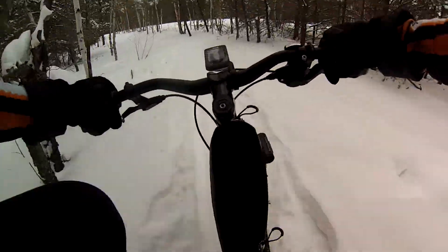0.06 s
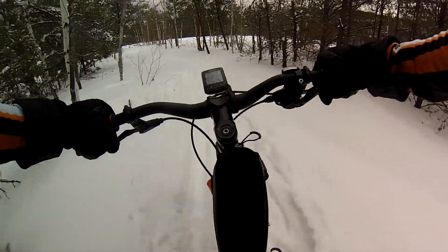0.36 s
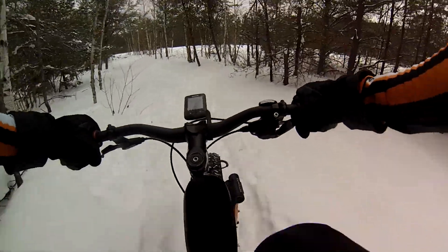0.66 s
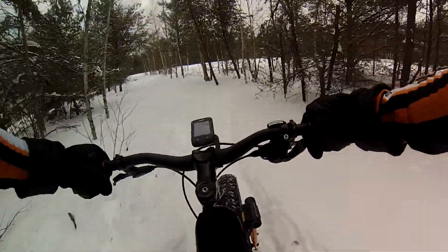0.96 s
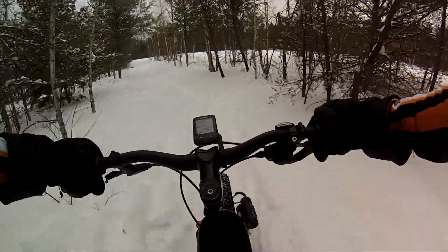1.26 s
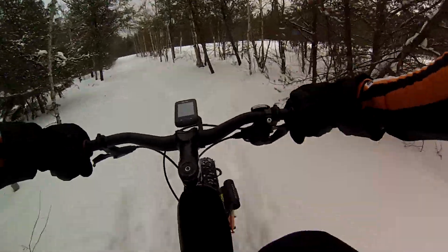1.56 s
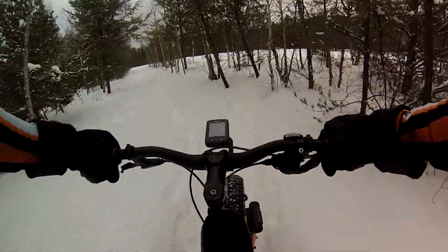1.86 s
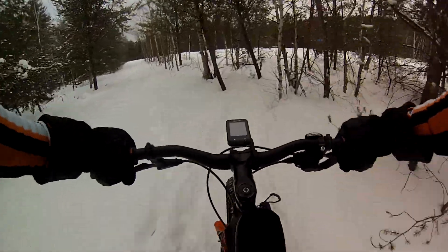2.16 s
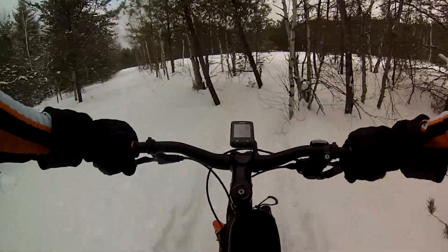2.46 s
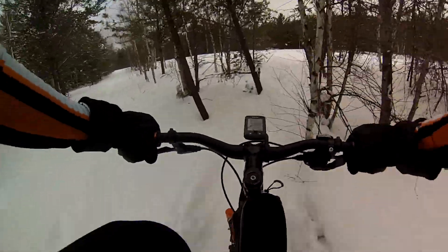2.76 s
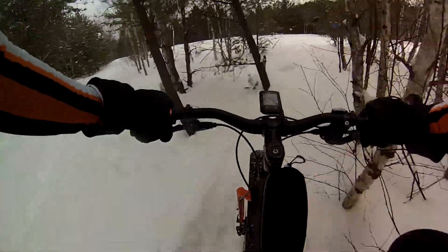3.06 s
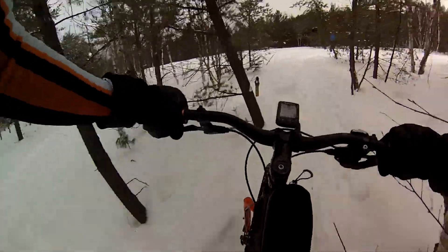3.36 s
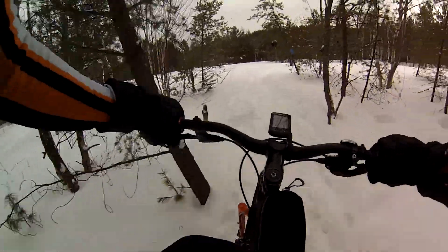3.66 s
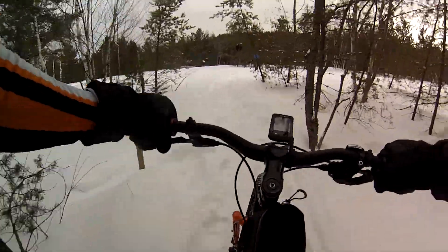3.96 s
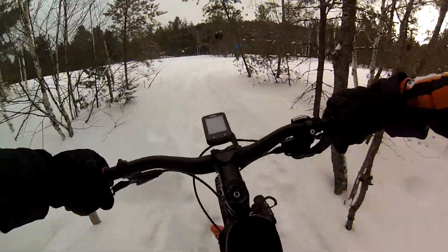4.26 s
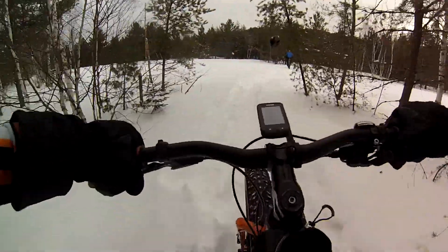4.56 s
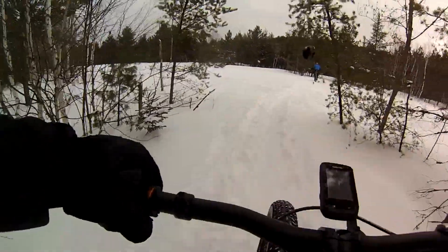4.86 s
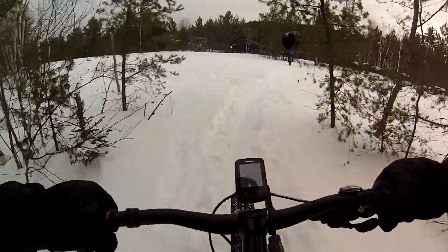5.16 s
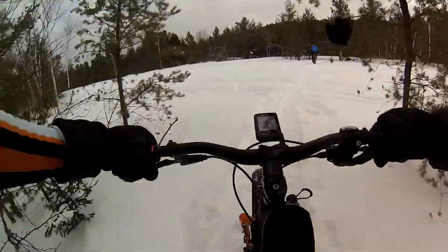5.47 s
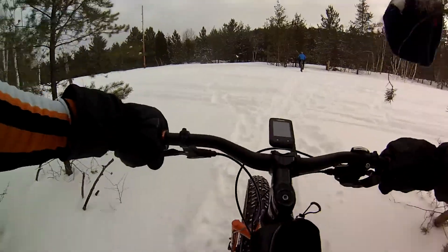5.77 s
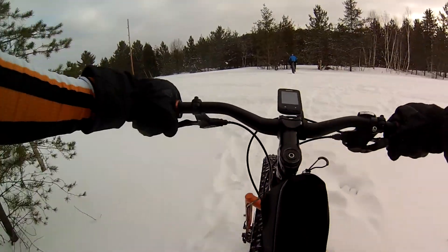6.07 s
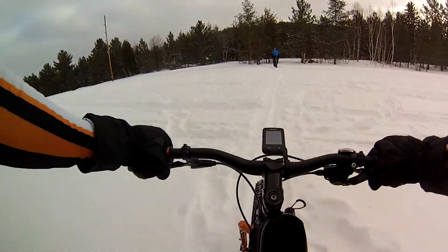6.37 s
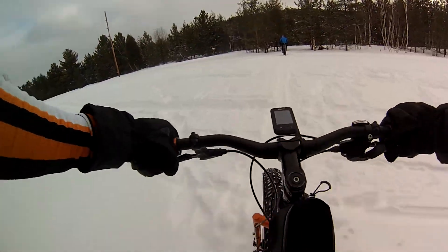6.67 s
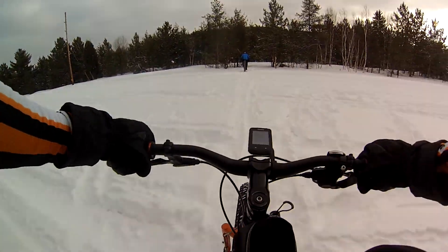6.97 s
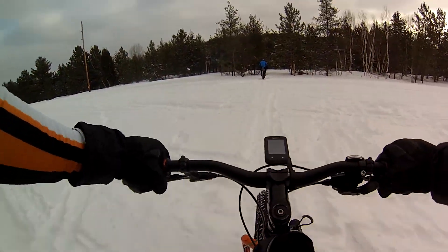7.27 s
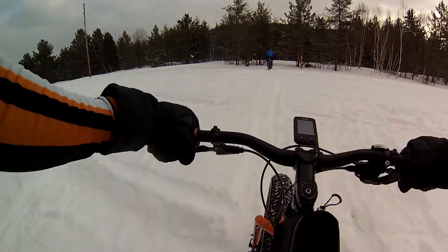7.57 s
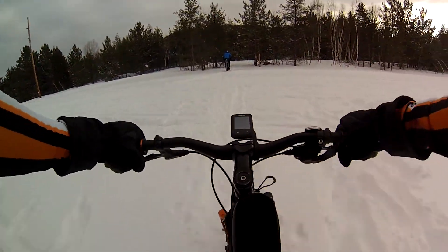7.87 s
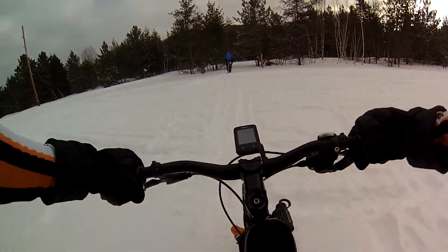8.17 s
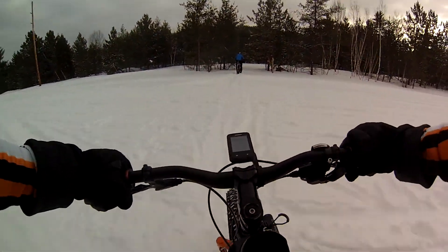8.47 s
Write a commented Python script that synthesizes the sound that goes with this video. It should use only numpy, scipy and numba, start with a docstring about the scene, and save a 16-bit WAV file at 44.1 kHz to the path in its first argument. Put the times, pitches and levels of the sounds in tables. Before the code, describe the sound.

A fast heartbeat thumps from start to finish, about 145 beats a minute, heard close and muffled through a closed camera case on a cyclist's chest. Each deep thud has a brief, slight buzz. Under it runs a low rumble of body sway, swelling over ruts around 2.2, 2.6, 3.6, 4.5 and 7.9 seconds. Tyres hush and crunch very faintly in the snow.

The bike gives light, dry knocks, often with soft harness bumps, at about 1.5, 2.2, 2.9, 3.4, 3.6, 6.1 and 6.6 seconds. Between 3.2 and 3.9 seconds twigs or a sleeve rustle quietly, with a few thin snaps of ice or twig. Small, sharp plastic ticks come near 0.2, 4.6, 5.5, 7 and 7.7 seconds, the clearest at 5.5. From 7.6 to 8.4 seconds the knocks and clicks bunch together while the heartbeat keeps its pace.

```python
"""Fat-tyre bike on a snowy trail

The ride is heard from a closed camera case strapped to the rider's chest. A fast heartbeat thumps
through the strap, and the camera's stepped limiter buzzes briefly on each big swing. The body's sway
rumbles, tyres hush and crunch in the snow, twigs or a sleeve rustle, and the bike knocks and ticks."""
import sys
import numpy as np
from scipy import signal
from scipy.fft import rfft, irfft, next_fast_len
from scipy.io import wavfile
from scipy.ndimage import uniform_filter1d, map_coordinates
from numba import njit

SR = 44100
rng = np.random.default_rng(int(sys.argv[2]) if len(sys.argv) > 2 else 0)


def wav_out(sig):
    """Save sig, one row per channel (or a flat mono array), as 16-bit PCM at SR to the path in sys.argv[1]."""
    wavfile.write(sys.argv[1], SR, np.round(np.clip(np.atleast_2d(sig).T, -1, 1) * 32767).astype(np.int16))


N = 384111
TIME = np.arange(N) / SR
LURCH_S = 0.091  # standard deviation in time of a lurch or glide

# Heartbeats. Each row: time in seconds, outward push, inward draw and recoil in dB,
# delay of the recoil in seconds, split of the recoil from 0 to 1.
BEATS = [(0.2207, -6, -9.5, -7.5, 0.022, 0.14), (0.6292, -7, -7.5, -12.5, 0.024, .65),
         (1.0431, -4.5, -9.5, -12, 0.022, 0.14), (1.4526, -6.5, -14, -6.5, 0.022, 0.72),
         (1.864, -9.5, -9.5, -13.5, 0.027, 0.77), (2.277, -5, -12.5, -6.5, 0.018, 0),
         (2.6836, -4.5, -14.5, -9.5, .026, 0.83), (3.0944, -7.5, -6.5, -26, 0.03, .25),
         (3.5092, -3.5, -7, -11, .023, 0), (3.920, -9.5, -9, -12.5, 0.027, .7),
         (4.3272, -4.5, -10.5, -17, 0.024, 0.24), (4.7414, -5.5, -9, -10, 0.021, 0),
         (5.15, -7, -13, -12, 0.024, 0.83), (5.5642, -5, -8, -11, 0.026, 0.13),
         (5.9771, -5, -12, -8.5, 0.017, 0.3), (6.3812, -6.5, -12.5, -13, 0.024, 0.97),
         (6.7952, -5.5, -8.5, -11, 0.028, 0.97), (7.2074, -3.5, -9.5, -6.5, .021, 0.04),
         (7.6148, -6.5, -18, -14, 0.022, 0.84), (8.0251, -2, -11.5, -10.5, 0.023, 0.5),
         (8.4374, -6, -6.5, -5, .019, 0.03)]


def heart(draw_width=.0057, push_width=.0049, recoil_width=.004, second_hz=54.3, second_db=-35.5):
    """Conduction through the body: each beat draws the chest wall in and pushes it out; it recoils."""
    out = np.zeros(N)
    t = np.arange(SR // 2) / SR - .1
    lobe = lambda at, width: np.exp(-.5 * ((t - at) / width) ** 2)
    for s, push_db, draw_db, recoil_db, lag, split in BEATS:
        push = amp(push_db) * lobe(0, push_width)
        lead = .0041 + .012 * amp(draw_db)  # a deeper draw starts earlier
        draw = amp(draw_db) * lobe(-lead, draw_width)
        early_recoil = (.47 * split - .17) * lobe(lag - .0115, .0033)
        recoil = amp(recoil_db) * lobe(lag, recoil_width) + early_recoil
        settle = amp(-18) * (lobe(lag + .018, 0.009) - 0.29 * lobe(lag + 0.1134, 0.025))
        second_s = 0.21 + rng.normal(0, 0.0068)  # the soft second heart sound
        envelope = amp(second_db + rng.normal(0, 0.54)) * lobe(second_s, 0.013)
        second = envelope * np.sin(2 * np.pi * second_hz * (t - second_s))
        add(out, s + t[0], push - draw - recoil + settle + second)
    return out


def sway(level_db=-26.5, dip_db=13, cap_db=-12.5):
    """Soft saturation: the torso rocks the case in a deep rumble, capped so its swells do not buzz."""
    # Spectrum of the rocking. Each row: frequency in Hz, relative level in dB.
    spectrum = [(5, -19), (11, -2.5), (17, 3.5), (25, -3), (35, -12.5), (50, -22), (70, -29), (100, -37.5),
                (150, -44.5), (250, -69.5), (500, -77), (1000, -110)]
    # Glides over smooth snow. Each row: time in seconds, change of the rumble in dB.
    glides = [(0.92, -0.5), (1.25, -2), (1.98, -5), (4.23, -9.5), (5.35, -3), (5.66, -1.5), (5.88, -2.5),
              (6.92, 2), (7.78, -4), (8.62, 3.5)]
    rumble = coloured(rng.standard_normal(N), spectrum)
    local_rms = np.sqrt(np.abs(uniform_filter1d(rumble ** 2, size=6000)) + 1e-6)
    beating = beat_swells(0, .022)  # the rumble dips briefly under each heartbeat thump
    gliding = sum(db * swell(s, LURCH_S) for s, db in glides)
    rocking_db = level_db + lurching() + gliding + 2.2 * wobble(5) - dip_db * beating
    rocking = amp(rocking_db) * unit(rumble / local_rms)
    swing = np.abs(signal.hilbert(rocking, next_fast_len(N)))[:N] / amp(cap_db)
    return rocking / (1 + swing ** 6) ** (1 / 6)


def lurching():
    """Base excitation: the dB that ruts add to the rocking of bike and rider."""
    # Lurches through ruts. Each row: time in seconds, rise of the rumble in dB.
    lurches = [(2.151, 9.5), (2.572, 9.5), (2.972, 3), (3.601, 8.5), (4.5, 12), (6.121, 5), (6.684, 4.5),
               (7.929, 12.5), (8.23, 1), (8.39, 3.5)]
    return sum(db * swell(s, LURCH_S) for s, db in lurches)


def flutter(level_db=-28.5):
    """Transient vibration: chest wall and strap shiver in the wake of every beat."""
    # Spectrum of the shiver. Each row: frequency in Hz, relative level in dB.
    spectrum = [(25, -22), (50, -5), (74, 6), (100, -13), (160, -28), (240, -37), (500, -46.5), (1000, -82)]
    wake = beat_swells(delay=0.013, width=0.017)
    return amp(level_db) * wake * coloured(rng.standard_normal(N), spectrum)


def frame_knocks(focus_db=6.5, focus_octaves=0.2):
    """Modal ringing: ruts knock the frame, and where a blow lands decides which modes ring most."""
    # Knocks of the frame and its bag. Each row: start in seconds, peak in dB, favoured pitch in Hz.
    knocks = [(0.615, -41, 1530), (1.452, -35, 1500), (1.519, -41, 1370), (2.1522, -27.5, 1600),
              (2.899, -27, 1630), (3.3948, -33, 1490), (3.598, -28, 1290), (4.364, -42, 1250),
              (4.512, -41, 900), (5.701, -41, 950), (5.808, -44, 1250), (6.137, -31.5, 1600),
              (6.604, -46, 1400), (6.645, -38.5, 1600), (7.614, -34, 1240), (7.932, -31.5, 1250),
              (7.935, -47, 2200), (8.261, -39, 1250), (8.31, -31, 980), (8.42, -28.5, 1600)]
    # Modes of the frame. Each row: frequency in Hz, relative level in dB, 60 dB decay time in seconds.
    frame = [(370, -4.5, 0.032), (540, -2.5, 0.011), (895, 6, 0.015), (1254, -2, 0.021),
             (1606, -2.5, 0.019), (1990, -11, 0.017), (2410, -9, 0.012)]
    out = np.zeros(N)
    for s, db, centre_hz in knocks:
        modes = [(hz, level + focus_db * np.exp(-(np.log2(hz / centre_hz) / focus_octaves) ** 2), t60)
                 for hz, level, t60 in frame]
        add(out, s, amp(db) * blow(modes, attack=0.0006, scrape=0.091, scrape_t60=0.026))
    return out


def mount_ticks(gain_db=1.0, band_hz=(1860, 3400)):
    """Band-limited radiation: the small plastic mount rings in a narrow band over a broad contact tap."""
    # Ticks of the mount. Each row: start in seconds, level in dB.
    ticks = [(2.155, -40), (2.846, -40), (3.388, -41), (4.565, -31), (4.8224, -39), (5.55, -21.5),
             (6.0354, -41.5), (7.0447, -27.5), (7.92, -42), (8.218, -48)]
    # Modes of the mount. Each row: frequency in Hz, relative level in dB, 60 dB decay time in seconds.
    modes = [(1980, 0, 0.022), (2270, 6, 0.013), (2560, 7.5, 0.0066), (2840, 0.5, 0.0096)]
    # Spectrum of the tap. Each row: frequency in Hz, relative level in dB.
    tap = [(600, -19), (1400, -4), (2500, 8), (3400, 0), (4600, 6), (5800, -5), (7200, -4), (10000, -16),
           (12300, -4), (15000, -30)]
    band = signal.butter(5, band_hz, 'bandpass', fs=SR, output='sos')
    out = np.zeros(N)
    for s, db in ticks:
        ring = signal.sosfilt(band, blow(modes, attack=0.00022, scrape=0.0089, scrape_t60=0.011))
        add(out, s, amp(db + gain_db) * (ring + 0.36 * burst(tap, t60=0.0068)))
    return out


def case_clicks():
    """Hard impact: a brief contact gives the case a broadband click."""
    # Clicks of the case. Each row: start in seconds, peak in dB.
    clicks = [(0.215, -33.5), (7.741, -25), (8.0997, -37)]
    # Spectrum of a click. Each row: frequency in Hz, relative level in dB.
    spectrum = [(500, -5), (1200, 3.5), (2500, 0.5), (4200, -2), (5800, -3), (8200, -6), (10500, -16),
                (12400, 3), (13700, -17), (15500, -9)]
    return bursts(clicks, spectrum, t60=0.0082)


def harness_bumps():
    """Soft impact: the harness meets the jacket in a long contact that favours low frequencies."""
    # Bumps of the harness. Each row: start in seconds, peak in dB.
    bumps = [(0.456, -35), (0.886, -41), (0.957, -40), (1.414, -32), (2.151, -27), (2.211, -44),
             (2.895, -32), (3.091, -26), (4.154, -40), (4.361, -34.5), (4.504, -36), (4.623, -38),
             (5.695, -34), (5.729, -39), (6.064, -39), (6.132, -35), (6.599, -37), (6.644, -30),
             (7.928, -34.5), (8.125, -35), (8.231, -40), (8.26, -36)]
    # Spectrum of a bump. Each row: frequency in Hz, relative level in dB.
    spectrum = [(50, -14), (130, 12), (220, -1.5), (380, -16.5), (600, -12), (1200, -31.5), (3000, -52)]
    return bursts(bumps, spectrum, t60=0.059)


def ice_snaps(gain_db=-1):
    """Brittle fracture: bits of ice and twig break with a thin snap."""
    # Fractures. Each row: start in seconds, level in dB.
    snaps = [(0.675, -50), (1.757, -38.5), (2.157, -46), (3.243, -42), (3.328, -49), (3.342, -37),
             (3.3895, -27.5), (3.428, -52), (3.482, -50), (3.5995, -25), (3.622, -38), (4.398, -44),
             (4.513, -36), (4.5655, -35), (6.2253, -48), (7.918, -41), (8.082, -40), (8.2183, -40.5)]
    # Spectrum of a snap. Each row: frequency in Hz, relative level in dB.
    spectrum = [(500, 7), (1500, 5), (2800, 1.5), (4400, -3), (7000, -1.5), (9000, -14), (12500, -12),
                (15500, -36)]
    return amp(gain_db) * bursts(snaps, spectrum, t60=0.0098)


def snow(hush_db=-0.76, crunch_db=-7.0, powder_db=-68.5, crumbs_db=-79.5, rut_share=0.05):
    """Granular noise: tyres press snow into a hush and crunch; powder hisses and flung crumbs patter."""
    # Level of the tyre hush. Each row: time in seconds, level in dB.
    roll = [(0.0, -57.5), (0.24, -58.5), (0.9, -59), (1.09, -60), (1.95, -59.5), (3.13, -59), (3.3, -61.5),
            (3.54, -58.5), (4.2, -60.5), (4.6, -56), (5.2, -59), (6.1, -57.5), (6.45, -61), (6.81, -59),
            (7.42, -59.5), (8.01, -59), (8.71, -56.5)]
    # Spectrum of the hush. Each row: frequency in Hz, relative level in dB.
    tyres = [(80, -19), (160, 5), (330, 4), (500, 1.5), (750, -4), (930, -4.5), (1060, -6.5), (1230, -0.5),
             (1400, -5.5), (1580, -8), (1820, -12.5), (2050, -10.5), (2350, -10), (2900, -21), (3500, -29)]
    # Spectrum of loose snow. Each row: frequency in Hz, relative level in dB.
    powder = [(1500, 0), (3000, 4.5), (3900, 2.5), (4800, 4.5), (5600, 2.5), (6800, 5.5), (8200, 1),
              (10300, 0.5), (11200, 2), (12300, -4.5), (13200, 0), (14800, -25), (16000, -30)]
    tyre_db = np.interp(TIME, *np.transpose(roll)) + rut_share * lurching()
    hiss_db = powder_db + 0.23 * (tyre_db - tyre_db.mean())
    load = wobble(7)  # the load on the tyres changes over the ruts
    hush = amp(hush_db + .5 * load + 2.1 * wobble(30)) * coloured(rng.standard_normal(N), tyres)
    crunch = amp(crunch_db + 2 * load) * case_resonance(grains(rate=400, spread_db=1.0))
    hiss = amp(hiss_db + 0.9 * wobble(6)) * coloured(rng.standard_normal(N), powder)
    crumbs = amp(crumbs_db + 4.4 * load) * coloured(grains(rate=45, spread_db=4), powder)
    return amp(tyre_db) * (hush + crunch) + hiss + crumbs


def rustles(rise_db=15.5, fall_db_per_s=227, case_db=-6):
    """Stick-slip friction: short scratchy rustles of twigs or a jacket sleeve ring the case."""
    # Rustles. Each row: time of the peak in seconds, rise time in seconds, level in dB.
    drags = [(1.865, .025, -77), (3.289, 0.21, -60.5), (3.345, 0.036, -67), (3.42, .06, -61),
             (3.485, 0.1, -58), (3.635, 0.096, -59.5), (3.70, .07, -75), (3.77, .09, -66),
             (3.87, 0.063, -70), (4.41, .025, -64), (4.55, .05, -66), (7.985, 0.04, -60),
             (8.105, 0.027, -65)]
    # Spectrum of the scratch. Each row: frequency in Hz, relative level in dB.
    spectrum = [(500, -30), (1250, 17), (1850, 13.5), (2700, 11.5), (4000, -1.5), (7000, 3.5), (9500, -4),
                (12000, -5), (15000, -18)]
    envelope = np.zeros(N)
    for s, length, db in drags:
        shape_db = np.minimum(rise_db * (TIME - s) / length, fall_db_per_s * (s - TIME))
        envelope += amp(db + shape_db) * (TIME > s - length)
    scratch = amp(4.0 * wobble(90)) * coloured(grains(rate=960, spread_db=-1.5), spectrum)
    ring = amp(case_db) * case_resonance(grains(rate=1100, spread_db=2.0))
    return envelope * (scratch + ring)


def thump_crackle(level_db=-54):
    """Gated shot noise: a faint crackle gives body to the buzz on each thump."""
    # Spectrum of the crackle. Each row: frequency in Hz, relative level in dB.
    spectrum = [(400, -16.5), (900, 2.5), (1450, -6), (2400, -2), (3500, -9.5), (7000, -11.5), (15000, -26)]
    envelope = beat_swells(delay=0.0049, width=0.0052)
    return amp(level_db) * envelope * coloured(grains(rate=400, spread_db=4.5), spectrum)


def spoke(start_s=1.756, hz=4650, level_db=-49, t60=0.038):
    """Damped free vibration: a spoke flicked by a twig gives one thin ping."""
    out = np.zeros(N)
    t = np.arange(SR // 16) / SR
    add(out, start_s, amp(level_db - 60 * t / t60) * np.sin(2 * np.pi * hz * t))
    return out


def case_resonance(x, drift_db=3.5):
    """Cavity resonance: the air in the case rings at a few pitches, each swelling and fading at random."""
    # Air modes. Each row: frequency in Hz, bandwidth in Hz, relative level in dB.
    modes = [(925, 89, 2.5), (1246, 170, -4.5), (1584, 117, -3), (2304, 200, -7), (2690, 180, -7.5)]
    out = np.zeros(N)
    for k, (hz, width, db) in enumerate(modes):
        ring = unit(filtered(x, lambda f: 1j * f * width / (hz ** 2 - f ** 2 + 1j * f * width)))
        out += (-1) ** k * amp(db + drift_db * wobble(5)) * ring
    return unit(out)


def blow(modes, attack, scrape, scrape_t60):
    """Convolution: an impulse with a gritty scrape drives damped modes; peak 1."""
    t = np.arange(SR // 16) / SR
    ring = np.zeros(len(t))
    for k, (hz, db, t60) in enumerate(modes):
        decay = amp(db + rng.normal(0, 2.1) - 60 * t / t60)
        ring += (-1) ** k * decay * np.sin(2 * np.pi * hz * rng.normal(1, 0.013) * t)
    force = scrape * rng.standard_normal(len(t)) * amp(-60 * t / scrape_t60)
    force[0] = 1
    hit = signal.fftconvolve(ring * (1 - np.exp(-t / attack)), force)[:len(t)]
    return hit / np.abs(hit).max()


def burst(spectrum, t60):
    """Exponential decay: a dying puff of noise; peak 1."""
    t = np.arange(SR // 16) / SR
    envelope = amp(-60 * t / t60) * (1 - np.exp(-40 * t / t60))
    puff = envelope * coloured(rng.standard_normal(len(t)), spectrum)
    return puff / np.abs(puff).max()


def bursts(events, spectrum, t60):
    """Superposition of one fresh puff for each event."""
    out = np.zeros(N)
    for s, db in events:
        add(out, s, amp(db) * burst(spectrum, t60))
    return out


def grains(rate, spread_db):
    """Shot noise: random impulses of uneven size, rate a second."""
    size = amp(spread_db * np.minimum(rng.exponential(size=N), 3))
    return unit((rng.random(N) < rate / SR) * size * rng.choice([-1, 1], N))


def swell(s, width):
    """A Gaussian bell of height 1 round time s."""
    return np.exp(-.5 * ((TIME - s) / width) ** 2)


def beat_swells(delay, width):
    """A bell delay seconds after every heartbeat."""
    return sum(swell(s + delay, width) for s, *_ in BEATS)


def wobble(rate):
    """A smooth random curve, rate knots a second."""
    return map_coordinates(rng.standard_normal(int(N * rate / SR) + 4), [TIME * rate])


def filtered(x, response):
    """Linear filtering: the spectrum of x times a frequency response."""
    size = next_fast_len(len(x) + 8192)
    return irfft(rfft(x, size) * response(np.fft.rfftfreq(size, 1 / SR)), size)[:len(x)]


def coloured(x, spectrum):
    """x shaped by (Hz, dB) points, at rms 1."""
    f, db = np.transpose(spectrum)
    return unit(filtered(x, lambda hz: amp(np.interp(np.log(hz + 1), np.log(f + 1), db))))


def amp(db):
    """Decibels to gain."""
    return 10 ** (np.asarray(db) / 20)


def unit(x):
    """Scale to rms 1."""
    return x / np.sqrt(np.mean(x ** 2) + 1e-20)


def add(track, s, sound):
    """Mix a sound into the track at time s."""
    part = track[max(round(s * SR), 0):][:len(sound)]
    part += sound[:len(part)]


@njit
def gain_cut(over_db, attack, release):
    """Envelope following: the cut in dB climbs towards the overshoot, then decays (times in samples)."""
    cut, now = np.zeros(len(over_db)), 0.
    for i in range(len(over_db)):
        if over_db[i] > now:
            now += (over_db[i] - now) / attack
        else:
            now -= now / release
        cut[i] = now
    return cut


def limiter(x, ceiling_db=-12.0, attack_s=.00206, release_s=.06, lag_s=.00154, step_db=0.5349):
    """Gain quantisation: coarse steps cut a short sawtooth buzz into every big thump."""
    delayed = np.interp(TIME - lag_s, TIME, x)
    over_db = 20 * np.log10(np.abs(delayed) + 1e-9) - ceiling_db
    cut_db = gain_cut(over_db, attack_s * SR, release_s * SR)
    return x * amp(-step_db * np.round(cut_db / step_db))


def scene():
    """Superposition: everything reaches one microphone inside the case."""
    rider = heart() + flutter() + thump_crackle() + sway()
    trail = snow() + rustles() + spoke()
    rattles = frame_knocks() + mount_ticks() + case_clicks() + harness_bumps() + ice_snaps()
    return (rider + trail + rattles)[None]


def record(dry, top_hz=15400):
    """Limiting and low-pass filtering: the camera curbs the thumps and softens the top octave."""
    # The camera's response. Each row: frequency in Hz, gain in dB.
    treble = [(3000, 0.5), (9000, -2.5), (12000, -2.5), (15000, -6)]
    response = lambda hz: amp(np.interp(hz, *np.transpose(treble))) * (hz < top_hz)
    return np.array([filtered(limiter(channel), response) for channel in dry])


dry = scene()
out = record(dry)
wav_out(out)
```